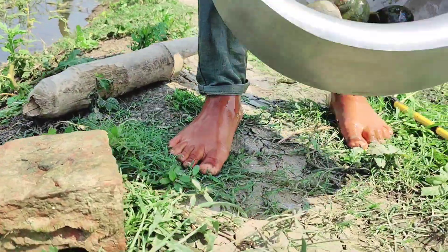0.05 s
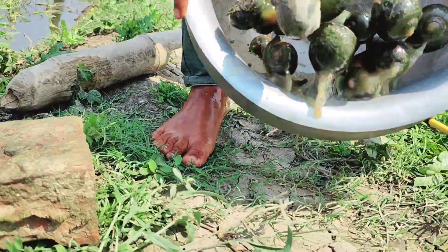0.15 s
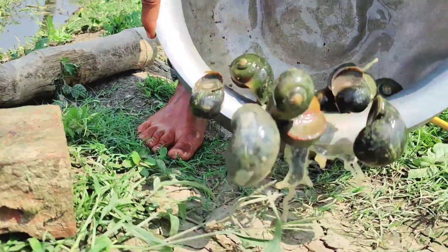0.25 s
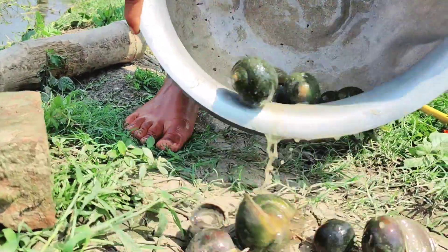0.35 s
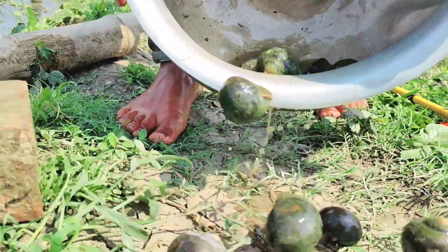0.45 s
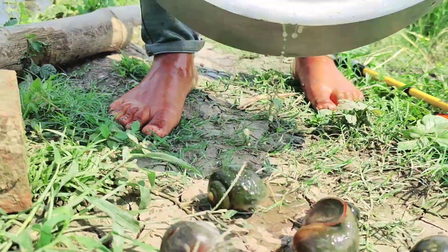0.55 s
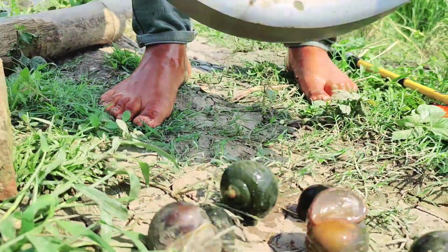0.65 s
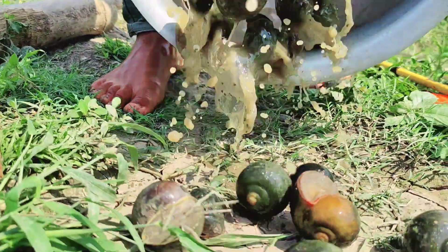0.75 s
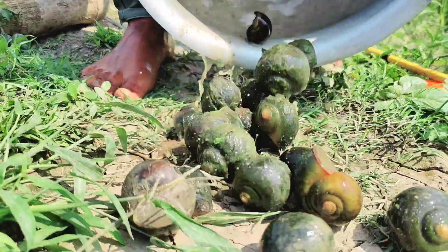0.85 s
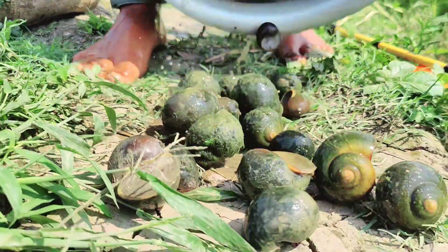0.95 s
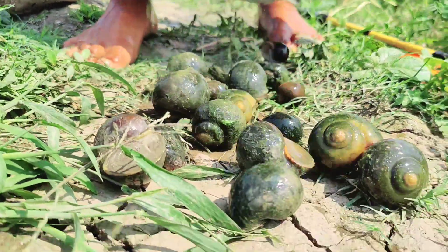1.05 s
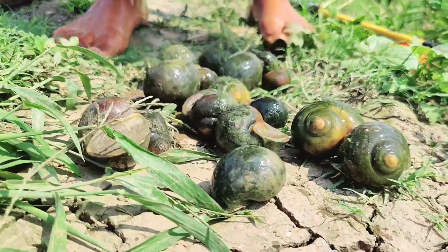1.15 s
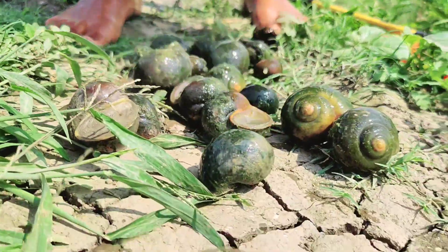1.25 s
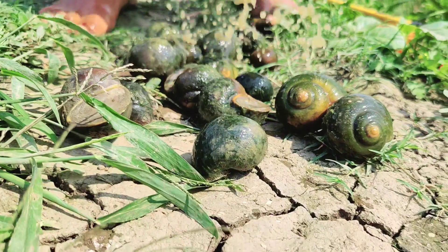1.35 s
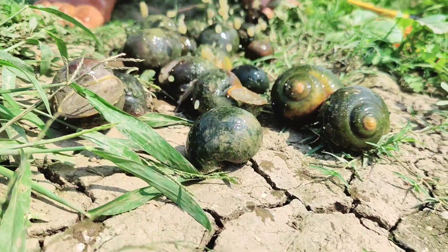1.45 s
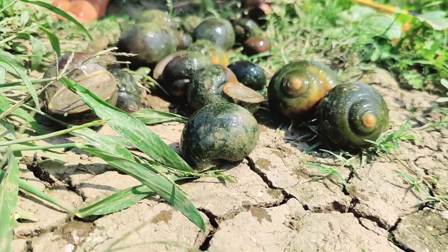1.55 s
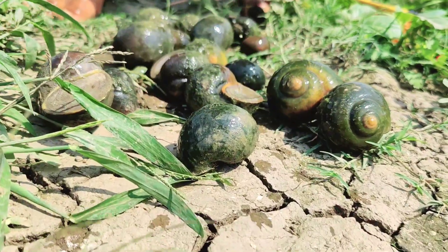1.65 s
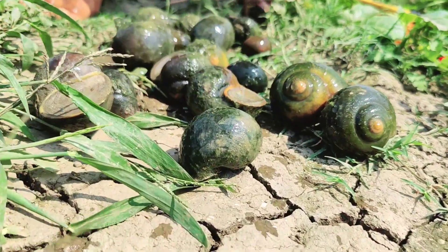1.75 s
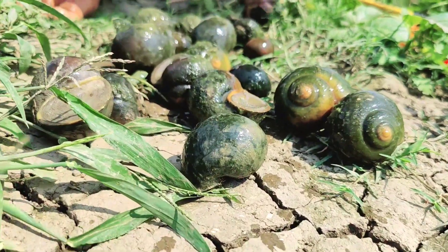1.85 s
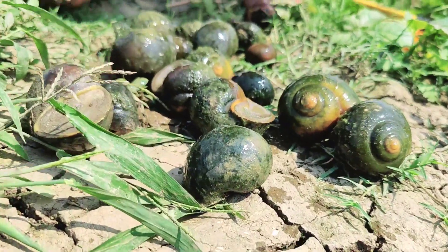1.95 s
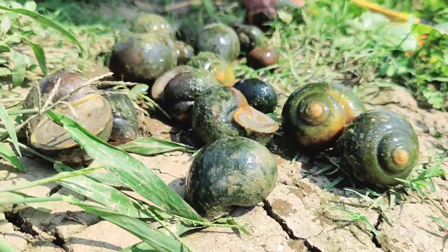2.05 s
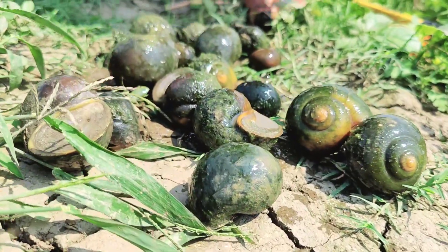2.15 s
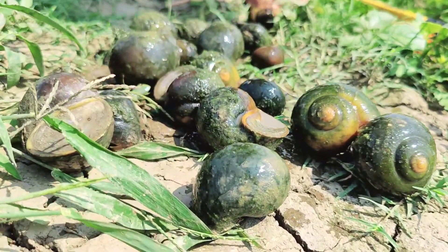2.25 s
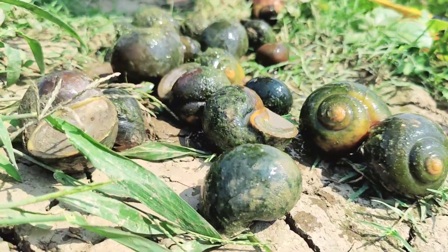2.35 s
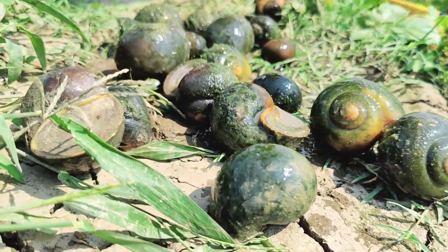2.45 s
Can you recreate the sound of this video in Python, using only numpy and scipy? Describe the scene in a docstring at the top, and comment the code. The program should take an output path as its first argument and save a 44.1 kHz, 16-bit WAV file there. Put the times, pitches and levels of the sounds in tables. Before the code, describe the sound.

Large snails and water tumble out of a ringing metal basin in two close bursts, shells clacking and thudding on dry soil, then a few drips and faint grass rustles, a distant engine chugging, outdoors, close stereo microphone.

```python
"""On dry ground by a field, water and big snails are tipped from a metal basin, close by, in two pours.
Shells clack, thud on the soil and set the basin ringing: each is a sum of fading tones and noise puffs.
Water is coloured noise plus swarms of tiny tones for bubbles and spray; drips are short noise puffs.
Grass rustles afterwards, as noise with a fine crackle. A slow one-cylinder engine chugs far off:
noise that swells and fades once per firing."""
import sys
import numpy as np
from scipy.fft import rfft, irfft, next_fast_len
from scipy.io import wavfile
from scipy.ndimage import map_coordinates

SR = 44100  # samples per second
rng = np.random.default_rng(int(sys.argv[2]) if len(sys.argv) > 2 else 0)


def waveform_to_disk(signal):
    """Save audio, clipped to [-1, 1], as 16-bit WAV at the path in sys.argv[1]."""
    frames = np.transpose(np.atleast_2d(signal))
    scaled = np.clip(frames, -1, 1) * 32767
    samples = np.round(scaled).astype(np.int16)
    wavfile.write(sys.argv[1], SR, samples)


N = 110250  # length in samples
SIDES = np.array([[1], [-1]])  # plus on the left, minus on the right


def amp(db):
    """Turn decibels into a gain."""
    return 10 ** (np.asarray(db) / 20)


def unit(x):
    """Scale a sound to an average (rms) strength of 1."""
    return x / np.sqrt(np.mean(x ** 2) + 1e-20)


def burst(x):
    """Scale a hit to the energy of 6 ms at rms 1, so short and long hits compare fairly."""
    return x / np.sqrt(np.sum(x ** 2) / (.006 * SR))


def level(rows):
    """Draw a gain curve through (t/s, level/dB) points, straight in decibels."""
    return amp(np.interp(np.arange(N) / SR, *np.transpose(rows)))


def colour(x, points, top_hz=SR):
    """Make each pitch range louder or softer by (f/Hz, level/dB) points; remove all from top_hz up."""
    n = x.shape[-1]
    padded = next_fast_len(n + 4096)
    hz = np.fft.rfftfreq(padded, 1 / SR)
    f, db = np.transpose(points)
    gain = amp(np.interp(np.log(hz + 1), np.log(f), db))
    return irfft(rfft(x, padded) * gain * (hz < top_hz), padded)[..., :n]


def noise(points):
    """Steady coloured noise of rms 1."""
    return unit(colour(rng.standard_normal(N), points))


def wide(make, side):
    """Stereo from two draws of a sound: one in the middle, one to the sides."""
    return make() + side * SIDES * make()


def add(out, s, x):
    """Mix x into out, starting at s seconds."""
    i = max(0, round(s * SR))
    out[:, i:i + x.shape[-1]] += x[..., :N - i]


def wobble(rate):
    """A smooth random curve through `rate` random points a second."""
    knots = rng.standard_normal(int(N * rate / SR) + 4)
    return map_coordinates(knots, [np.arange(N) * rate / SR])


def ring(hz, spread, t60, attack, count):
    """A small struck body: fading tones scattered about hz, the high ones dying sooner."""
    t = np.arange(SR // 6) / SR
    pitch, size, phase = rng.standard_normal((3, count, 1))
    ratio = np.exp(spread * pitch)
    fade = amp(4.7 * size - 60 * t * np.sqrt(ratio) / t60)
    tones = fade * np.sin(2 * np.pi * (np.minimum(hz * ratio, SR / 2) * t + phase))
    return burst(tones.sum(0) * (1 - np.exp(-t / attack)))


def crack(points, t60, attack):
    """A short puff of coloured noise: a quick rise, then a fade of 60 dB in t60 seconds."""
    t = np.arange(SR // 6) / SR
    puff = colour(rng.standard_normal(len(t)), points)
    return burst(puff * amp(-60 * t / t60) * (1 - np.exp(-t / attack)))


def grains(per_s, hz, spread, cycles, rise, scatter_db):
    """A stream of tiny fading tones, rms 1 in all; a positive rise makes each glide up in pitch."""
    count = int(per_s * N / SR)
    start, pitch, size = rng.random((count, 3)).T[:, :, None]
    f = np.minimum(hz * (pitch / (1 - pitch)) ** (spread / 2), SR / 2.5)
    k = np.arange(int(2 * cycles * SR / hz) + 8)
    age = k / SR * f / cycles  # a grain has faded by 40 dB at age 1
    fade = amp(-scatter_db * np.log(size * .97 + .03) - 40 * age)
    tone = fade * np.sin(2 * np.pi * cycles * age * (1 + rise * age / 2))
    place = (start * N).astype(int) + k
    return unit(np.bincount(place.ravel(), tone.ravel(), N)[:N])


# tone colour of the engine's exhaust: f/Hz, relative level/dB
EXHAUST_COLOUR = [(20, -28), (50, 0.5), (90, 2.5), (145, 1), (210, -7.5), (290, -13.5), (350, -17.5),
                  (410, -9.5), (470, -21), (530, -15), (620, -26), (900, -43), (2000, -66.5)]
ENGINE_HZ, FIRST_FIRING_S, CHUG_T60_S, ENGINE_DB = 14.78, .064, 0.19, -40  # ENGINE_HZ: firings a second
CHUG_FLOOR = .25  # share of steady noise between puffs


def engine():
    """The far engine puffs once a firing: exhaust noise that jumps up and fades until the next."""
    age = (np.arange(N) / SR - FIRST_FIRING_S) % (1 / ENGINE_HZ)
    puff = amp(-60 * age / CHUG_T60_S) * (1 - np.exp(-age / 0.0072))
    chug = unit(CHUG_FLOOR + puff)
    return amp(ENGINE_DB) * chug * wide(lambda: noise(EXHAUST_COLOUR), .1)


# tone colour of the open air: f/Hz, relative level/dB
AIR_COLOUR = [(20, 0), (80, -7.5), (300, 0), (900, -27.5), (2200, -18), (5000, -34.5), (15000, -43.5)]
AIR_DB = -56


def air():
    """The quiet hiss and rumble of the open air, as steady noise."""
    return amp(AIR_DB) * wide(lambda: noise(AIR_COLOUR), .5)


# nudges of wind on the microphone: t/s, level/dB (before a common lift)
WIND_BUFFETS = [(0.251, -26), (.385, -44.5), (1.378, -35.5), (1.556, -30.5)]
BUFFET_HZ, BUFFET_T60_S, BUFFET_LIFT_DB = 60, 0.033, 6.5


def wind():
    """Light wind nudges the microphone: low thumps that die at once."""
    out = np.zeros((2, N))
    for s, db in WIND_BUFFETS:
        thump = ring(BUFFET_HZ, 0.22, BUFFET_T60_S, attack=0.0046, count=4)
        add(out, s, amp(db + BUFFET_LIFT_DB) * thump)
    return out


# loudness of the rustle in the grass: t/s, level/dB
RUSTLE_LEVEL = [(0, -79), (1.33, -65.5), (1.462, -49.5), (1.512, -70.5), (1.554, -56.5), (1.63, -70.5),
                (1.72, -58), (1.82, -82), (2.03, -76), (2.074, -44.5), (2.134, -67.5), (2.232, -63),
                (2.338, -75), (2.462, -59.5), (2.5, -66)]
# tone colour of the rustle: f/Hz, relative level/dB
GRASS_COLOUR = [(400, -21), (1100, -2), (2300, 3.5), (4000, -2.5), (8000, -11), (15000, -32.5)]
# loudness of the fine crackle of wet blades: t/s, level/dB
CRACKLE_LEVEL = [(0, -85.5), (1.3, -72), (1.45, -57), (1.51, -69.5), (1.59, -55), (1.72, -55), (1.77, -66),
                 (1.81, -92), (2.5, -98.5)]


def grass():
    """Soft brushing, as coloured noise, and the fine crackle of wet blades, as tiny tones."""
    brushing = wide(lambda: noise(GRASS_COLOUR), .7)
    crackle = wide(lambda: grains(900, 9000, spread=.4, cycles=4, rise=0, scatter_db=4), .7)
    return level(RUSTLE_LEVEL) * brushing + level(CRACKLE_LEVEL) * crackle


# drips and wet ticks: t/s, body level/dB, treble over the body level/dB
DRIP_TIMES = [(.024, -56.5, 12), (.538, -37.5, 7), (.719, -51, 2.5), (1.081, -34.5, 3), (1.086, -41, 2),
              (1.179, -44, -3), (1.195, -47, -17.5), (1.249, -44, -1.5), (1.291, -52, -12.5),
              (1.588, -61, 9.5), (1.627, -64.5, 5.5), (1.69, -59, 7.5), (1.704, -55.5, 6.5),
              (1.744, -61, 8.5)]
# tone colour of a drip's body: f/Hz, relative level/dB
DRIP_BODY_COLOUR = [(300, -10.5), (900, -13.5), (2200, 2.5), (4000, -19), (15000, -30)]
# tone colour of a drip's treble: f/Hz, relative level/dB
DRIP_TREBLE_COLOUR = [(1500, -12.5), (4000, -1.5), (7500, 2), (15000, -10)]
DRIP_T60_S, DRIP_RISE_S = .022, .0005


def drips():
    """Each drip or wet tick is a puff of noise in two parts, body and treble."""
    out = np.zeros((2, N))
    for s, db, treble_db in DRIP_TIMES:
        def drip():
            """One drip: body plus treble."""
            body = crack(DRIP_BODY_COLOUR, DRIP_T60_S, DRIP_RISE_S)
            return body + amp(treble_db) * crack(DRIP_TREBLE_COLOUR, DRIP_T60_S, DRIP_RISE_S)
        add(out, s, amp(db) * wide(drip, .6))
    return out


# loudness of the bulk of the water gushing onto the soil: t/s, level/dB
GUSH_LEVEL = [(.08, -43.5), (.17, -51), (.21, -34.5), (.30, -37), (.36, -21), (.52, -30.5), (.62, -27.5),
              (.69, -45.5), (.745, -46.5), (.79, -36), (.84, -36), (.89, -47), (.92, -23.5), (1.04, -33.5),
              (1.08, -45.5), (1.2, -56.5), (1.3, -100)]
# tone colour of the gush: f/Hz, relative level/dB
GUSH_TONE = [(70, -30), (150, -7.5), (240, 4), (420, 1.5), (560, -5), (800, -10), (1300, -31.5),
             (3000, -50)]


def gush():
    """The bulk of the water gushing onto the soil: low noise in the middle."""
    return level(GUSH_LEVEL) * noise(GUSH_TONE)


# strength of the splashing flow: t/s, level/dB (before each part's own level)
FLOW_LEVEL = [(0, -39), (.06, -48.5), (.18, -54.5), (.235, -28), (.26, -18.5), (.31, -23.5), (.43, -19),
              (.52, -23), (.58, -32.5), (.66, -36.5), (.70, -53.5), (.75, -53), (.80, -17.5), (.86, -24),
              (.905, -51), (.925, -19.5), (1.04, -25), (1.06, -37.5), (1.15, -54.5), (1.3, -77.5),
              (1.4, -100)]
# tone colour of the splash: f/Hz, relative level/dB
SPLASH_COLOUR = [(100, -35.5), (400, -19), (750, -21.5), (1150, 0.5), (2300, 3.5), (4000, -7), (8000, -15),
                 (15000, -27.5)]
SPLASH_DB, BUBBLE_DB, SPRAY_DB = -1.5, -0.5, -16
BUBBLE_HZ, BUBBLES_PER_S, SPRAY_HZ, SPRAY_PER_S = 1742, 320, 6800, 1500


def splash():
    """The flow drives an uneven rush of noise, bubbles that glide up in pitch, and fine spray."""
    rush = wide(lambda: noise(SPLASH_COLOUR), 0.24) * amp(3.1 * wobble(160))
    bubbles = wide(lambda: grains(BUBBLES_PER_S, BUBBLE_HZ, spread=.42, cycles=32, rise=.04,
                                  scatter_db=2.5), 0.46)
    spray = wide(lambda: grains(SPRAY_PER_S, SPRAY_HZ, spread=0.83, cycles=2.5, rise=0,
                                scatter_db=0.5), .8)
    mix = amp(SPLASH_DB) * rush + amp(BUBBLE_DB) * bubbles + amp(SPRAY_DB) * spray
    return level(FLOW_LEVEL) * mix


# shells skidding over the metal: t/s, length/s, f/Hz, level/dB (about which it shakes)
SHELL_SKIDS = [(0, 0.0027, 1368, -11.5), (.25, 0.043, 1168, -19), (0.281, 0.033, 1003, -18.5),
               (.33, 0.048, 1194, -16.5), (0.416, 0.06, 1677, -16.5), (.808, 0.013, 1266, -24.5),
               (0.811, 0.067, 1160, -18.5), (.938, 0.053, 1166, -17)]
SKID_RISE_S, SKID_T60_S, SKID_WANDER_RAD, SKID_SHAKE_DB = .005, .065, .35, 2


def skids():
    """A sliding shell keeps one tone of the metal singing, unsteadily; then it dies quickly."""
    out, t = np.zeros((2, N)), np.arange(N) / SR
    for s, length, hz, db in SHELL_SKIDS:
        fade_db = 60 * np.maximum(t - length, 0) / SKID_T60_S
        hold = (1 - np.exp(-t / SKID_RISE_S)) * amp(db + SKID_SHAKE_DB * wobble(130) - fade_db)
        phase = 2 * np.pi * (hz * t + rng.random()) + SKID_WANDER_RAD * wobble(70)
        add(out, s, hold * np.sin(phase + .3 * SIDES))
    return out


# pitches of the basin's own tones: f/Hz
BASIN_PITCHES = [435, 696, 1011, 1169, 1368, 1502, 1666, 2008, 2287, 2549]
# the same tones in the same order: relative level/dB, time to fade by 60 dB/s
BASIN_TONES = [(-3, 0.57), (-6, 0.33), (-8, 0.15), (-3.5, 0.29), (-1.5, 0.29), (-21, 0.076), (-14, 0.1),
               (-5.5, 0.13), (-20, .16), (-23, 0.14)]
# knocks on the basin: t/s, level/dB, tilt/dB per octave (blows that flex the whole wall are dull)
BASIN_KNOCKS = [(0, -28, 2), (.252, -28.5, -1.5), (.345, -24.5, -3.5), (0.421, -14.5, 7.5),
                (0.502, -19, 0.5), (0.646, -26, 10.5), (.81, -29.5, -1.5), (.84, -34, -7.5),
                (0.941, -31.5, -4), (0.998, -34, -5.5)]
TILT_HZ = 1410  # the tilt leaves this pitch unchanged


def basin():
    """Shells tumbling over the metal feed its tones; the two channels hear each slightly apart."""
    drive, t = np.zeros((len(BASIN_TONES), N)), np.arange(N) / SR
    hz = np.array(BASIN_PITCHES)[:, None]
    db, t60 = np.transpose(BASIN_TONES)[:, :, None]
    fade = amp(db - 60 * t / t60) * (1 - np.exp(-t / 0.00071))
    for s, knock_db, tilt_db in BASIN_KNOCKS:
        add(drive, s, amp(knock_db + tilt_db * np.log2(hz / TILT_HZ)) * fade)
    phase, lag = rng.uniform(-1, 1, (2, len(BASIN_TONES), 1))
    turn = 2 * np.pi * (hz * t + phase)
    return np.array([(drive * np.sin(turn + ear * lag * hz / 2000)).sum(0) for ear in (1, -1)])


# shell blows: t/s, clack level/dB, f/Hz, thud level/dB, crack over the clack level/dB
# (levels before the common offsets below)
SHELL_BLOWS = [(0.1, -17.5, 1105, -29, -12.5), (.155, -33, 1400, -62, -9.5), (0.195, -24, 1150, -24.5, -4),
               (.209, -23.5, 1440, -18.5, 4), (0.222, -31.5, 1290, -26, -3), (0.244, -2, 1158, -13, 3),
               (0.25, -5.5, 1924, -10, -0.5), (0.261, -10, 1247, -9, 0), (0.27, 0, 1081, -20, -9),
               (.296, -8.5, 1032, -10.5, -8.5), (0.313, -2, 1053, -23, -9.5), (0.333, -3, 1352, -9.5, -6),
               (0.35, -3.5, 1171, -15, -10), (.368, -3.5, 1966, -7.5, -10), (0.386, -3, 1944, -11, -3.5),
               (.414, 1, 1634, -16.5, 3), (0.421, -13.5, 1607, -36.5, 9.5),
               (0.448, -13.5, 1550, -17, -14.5), (0.466, -5, 2220, -14.5, -6),
               (0.474, -19.5, 1540, -15, -1.5), (0.488, -7, 1637, -13, -6), (0.519, -4.5, 1390, -12, -16),
               (.54, -9, 1633, -22, 1.5), (0.595, -17.5, 2530, -9.5, -12), (0.6, -9.5, 1815, -18, -3),
               (.647, -6.5, 1583, -28.5, -26.5), (0.721, -52.5, 1517, -33, -0.5),
               (.757, -17, 1500, -21, -6.5), (0.767, -22.5, 1184, -19.5, -4), (.788, -2, 1628, -18, 4.5),
               (0.805, -5, 1463, -15.5, 5), (.814, -8.5, 1485, -30, 2.5), (.842, -11, 2410, -24.5, 6),
               (.916, -0.5, 2020, -21.5, -10), (0.925, -1, 1010, -22, 1), (0.938, -9.5, 1780, -24, 11),
               (0.962, -8, 2410, -18.5, 11.5), (1.0, -6, 1845, -23.5, 6), (1.016, -29, 1820, -27.5, 29),
               (1.042, -10, 1878, -28, 8), (1.11, -22, 2100, -40, 0.5)]
# tone colour of the crack: f/Hz, relative level/dB
CRACK_COLOUR = [(300, -34), (1500, -6), (4000, 2.5), (7000, -7.5), (15000, -16.5)]
CLACK_DB, MAIN_DB, CRACK_DB, THUD_DB = -14, 0.5, -9, -3
SHELL_T60_S, MAIN_T60_S, CRACK_T60_S, THUD_T60_S = 0.065, 0.049, .03, 0.03
SHELL_SPREAD, SHELL_SIDE, THUD_SPREAD = 0.29, 1, 0.2
THUD_HZ, THUD_RISE_HZ_PER_DB = 257, 0.9  # harder blows thud higher


def shells():
    """Each blow is a crack, the shell's short ring and a thud of the soil."""
    out = np.zeros((2, N))
    for s, db, hz, thud_db, crack_db in SHELL_BLOWS:
        body_hz = np.sqrt(hz * 2300)  # between the main tone and 2300 Hz
        body = wide(lambda: ring(body_hz, SHELL_SPREAD, SHELL_T60_S, attack=.0005, count=14), SHELL_SIDE)
        main = amp(MAIN_DB) * ring(hz, 0.026, MAIN_T60_S, attack=.0008, count=1)
        snap = wide(lambda: crack(CRACK_COLOUR, CRACK_T60_S, attack=0.0013), 0.96)
        add(out, s, amp(db + CLACK_DB) * (body + main + amp(CRACK_DB + crack_db) * snap))
        thud_hz = THUD_HZ + THUD_RISE_HZ_PER_DB * (db + 12)
        thud = ring(thud_hz, THUD_SPREAD, THUD_T60_S, attack=0.0025, count=4)
        add(out, s, amp(thud_db + THUD_DB) * thud)
    return out


# gain of the pour's left-right difference: f/Hz, level/dB
POUR_WIDTH = [(100, -8.5), (300, 0), (650, 2.5), (1000, -3), (2000, 0), (4000, 0.5), (8000, 3.5),
              (14000, -1.5)]
LEFT_DB = .5  # left is raised and right lowered by this much


def scene():
    """Everything in the open air; the pour sits slightly left and is narrower in the bass."""
    left, right = shells() + basin() + skids() + splash() + gush() + drips()
    pour = (left + right) / 2 + SIDES * colour((left - right) / 2, POUR_WIDTH)
    return pour * amp(LEFT_DB * SIDES) + grass() + engine() + air() + wind()


# tone colour of the microphone: f/Hz, level/dB
MIC_COLOUR = [(20, -13), (60, -2.5), (4500, 1), (5400, -2), (6100, -4), (7100, 5.5), (8800, -0.5),
              (10000, 3.5), (11000, 2), (15000, 4.5)]
TOP_HZ = 15700


def record(dry):
    """The microphone's colour, then rounded peaks, then nothing from TOP_HZ up."""
    x = colour(dry, MIC_COLOUR)
    x = x / (1 + x ** 6) ** (1 / 6)
    return colour(x, [(1, 0), (SR, 0)], TOP_HZ)


dry = scene()
out = record(dry)
waveform_to_disk(out)
```